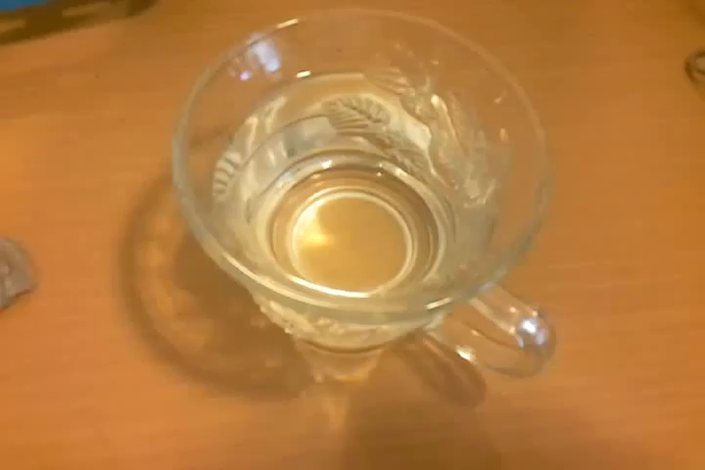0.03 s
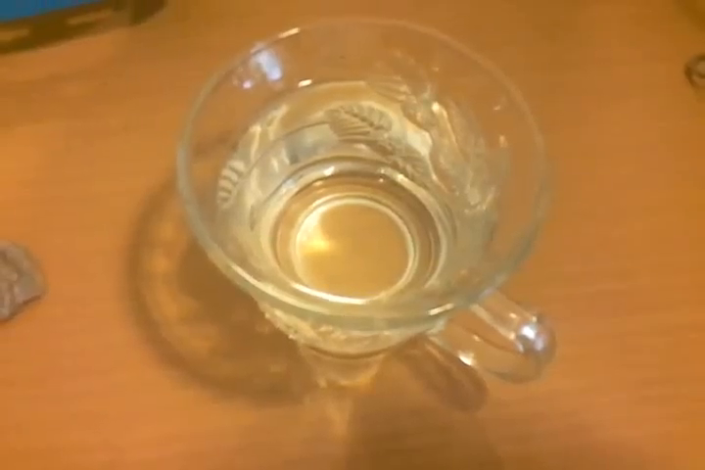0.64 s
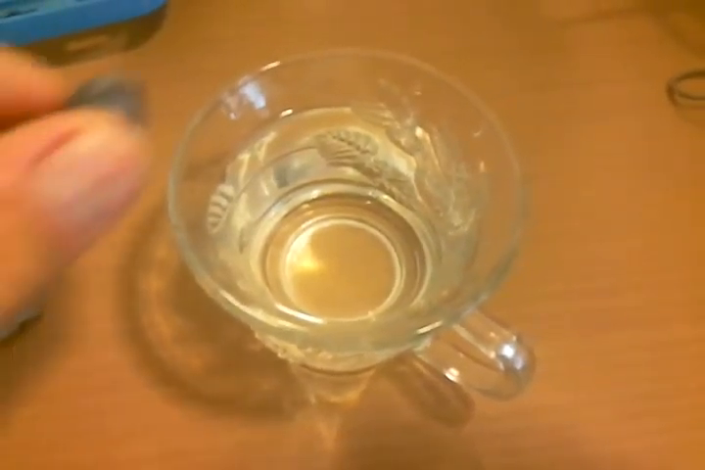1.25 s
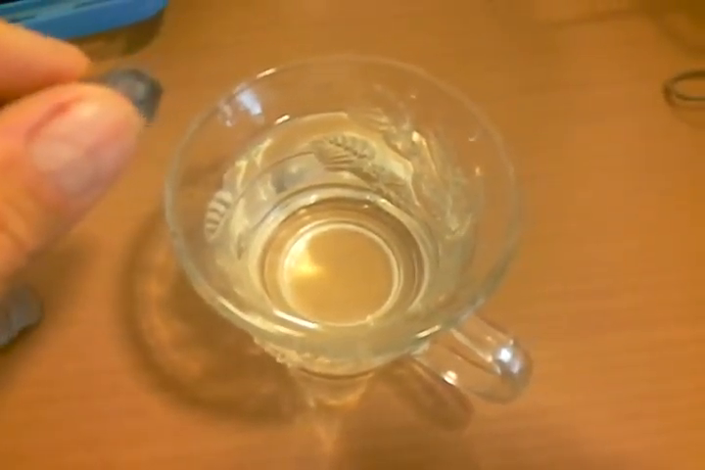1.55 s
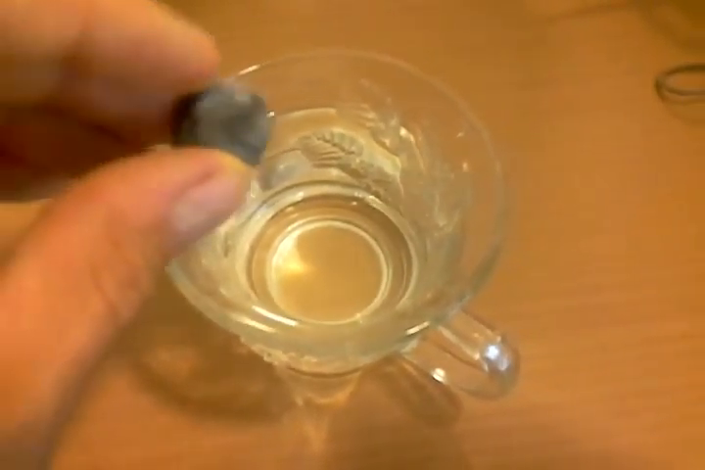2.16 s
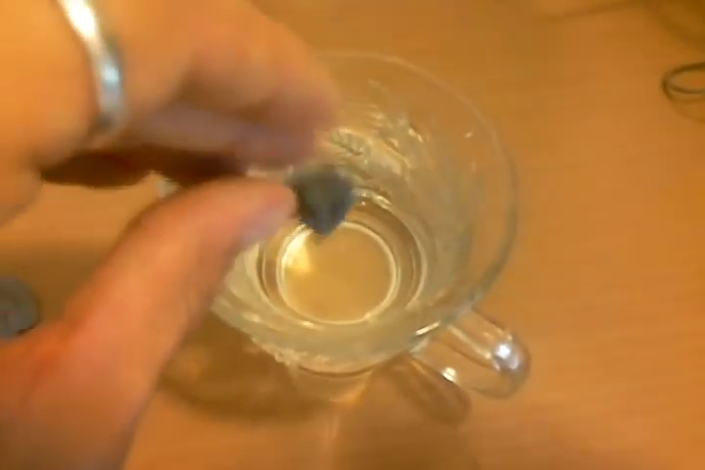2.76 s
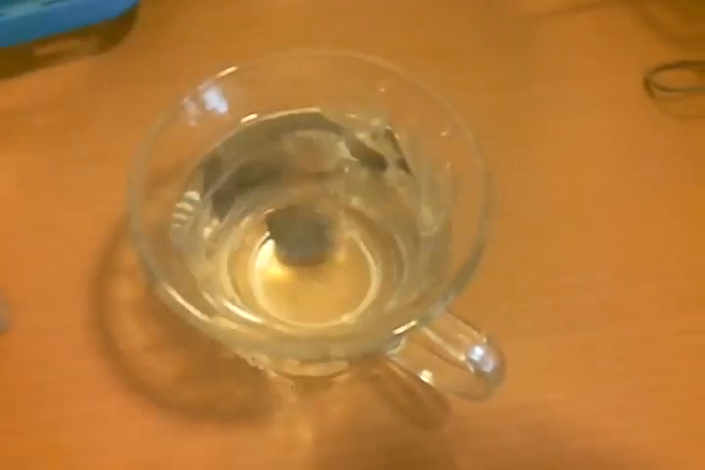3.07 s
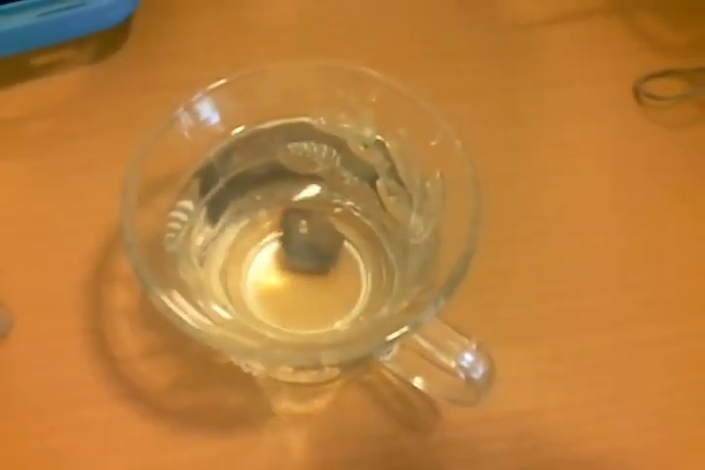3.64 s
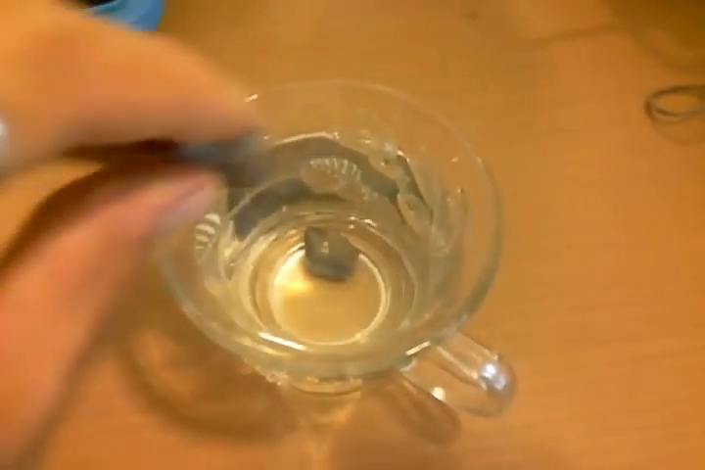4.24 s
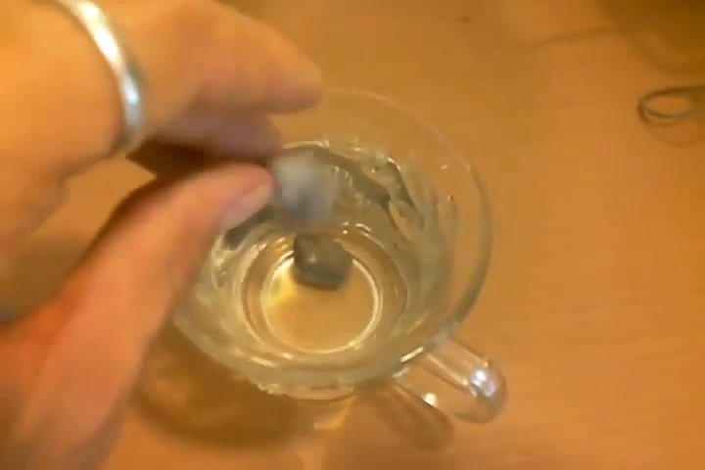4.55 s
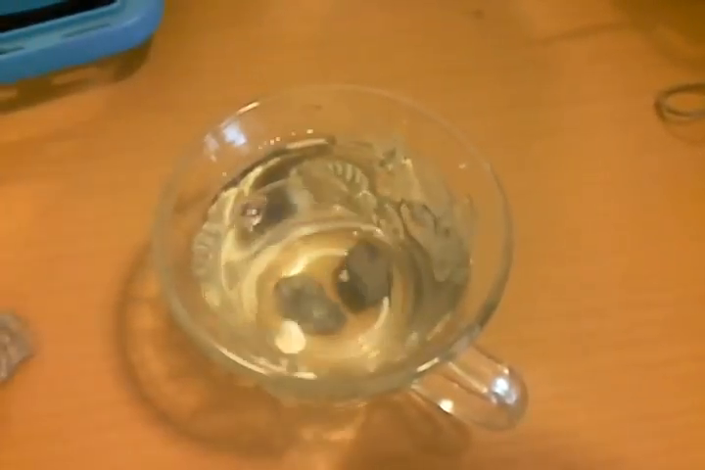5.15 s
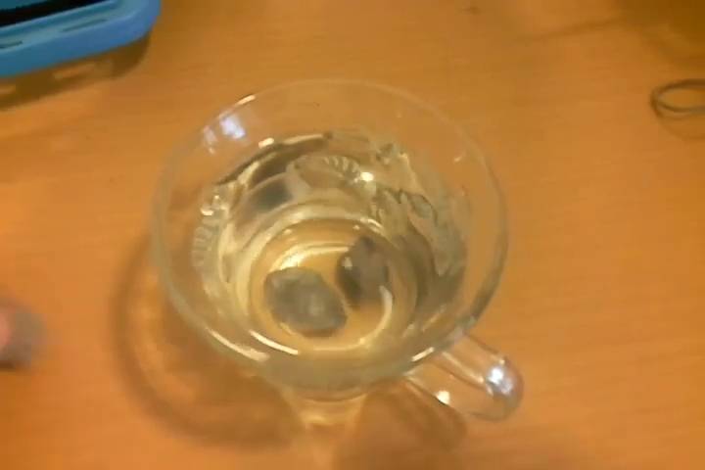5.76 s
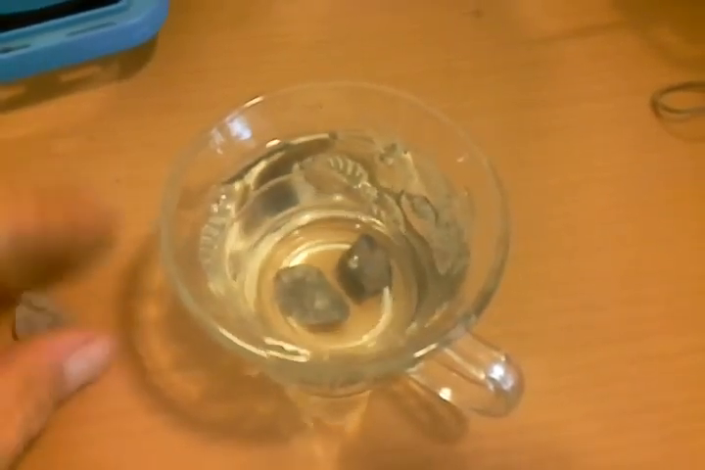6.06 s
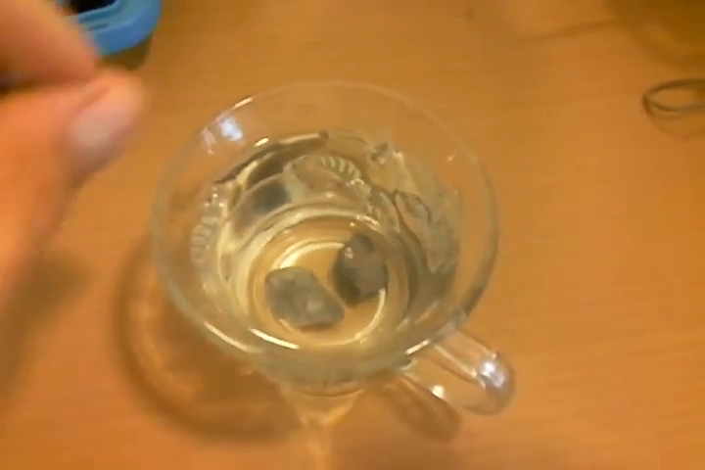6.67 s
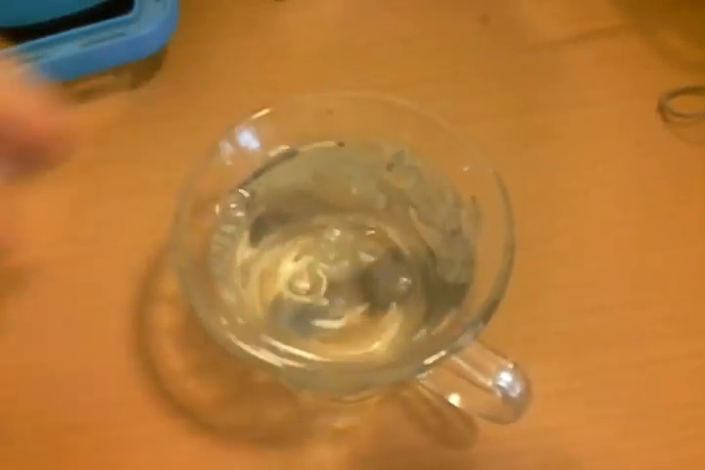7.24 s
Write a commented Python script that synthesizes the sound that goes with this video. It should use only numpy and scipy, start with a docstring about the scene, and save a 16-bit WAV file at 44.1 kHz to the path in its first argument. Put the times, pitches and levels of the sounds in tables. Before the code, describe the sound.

Heard close up in a small room, three stones fall one at a time into a glass of water, about two seconds apart. Each makes a short splash and plop, then a flurry of bright, glassy clinks as it bounces and settles. Between the second and third drops, loose stones knock, rattle and drag on a wooden tabletop. A low hum and soft hiss lie underneath.

```python
"""Three splashes, each with a flurry of glassy clinks: small stones drop one by one into a cup of water.
Each traps a few ringing bubbles and bounces: low in the cup it pings, higher up it excites the
resonant modes of the wall, which go slightly flat as the stone settles. Between drops, loose stones
knock and drag on the wooden table. A mains hum and soft hiss fill the small room."""
import sys
import numpy as np
from scipy import signal
from scipy.fft import rfft, irfft
from scipy.io import wavfile
from scipy.ndimage import uniform_filter1d, minimum_filter1d

SR = 44100
rng = np.random.default_rng(int(sys.argv[2]) if len(sys.argv) > 2 else 0)


def to_wav(s):
    """Save 16-bit WAV."""
    ch = np.atleast_2d(s).T  # columns
    pcm = np.round(np.clip(ch, -1, 1) * 32767)  # PCM
    wavfile.write(sys.argv[1], SR, pcm.astype(np.int16))


N = 331191

# the dropped stones: splash_s, splash_db, heft_db, brightness_db, flat_cents, settling_sag_cents
STONES = [(2.970, -29, 2.5, 11.5, -1.5, 5.1), (4.759, -19, 8.5, 3.5, 5, 17.6),
          (7.174, -18.5, 2, -1, 13, 10.3)]
# contacts of stone on glass: start_s, force_db, ping_hz, height (0 bottom, 1 wall),
# turn (0 clear of the handle, 1 in line with it)
CLINKS = [(2.9644, -12.5, 9200, 0.54, 0), (2.97, -4.5, 9320, 0.11, 0.29), (2.994, -22.5, 9300, 0.8, .0),
          (3.035, -21, 9740, 0.4, 0.24), (3.074, -28, 9250, 0.81, .05), (3.1075, -31, 9000, .05, 0.32),
          (3.128, -29, 9000, .05, 0.14), (3.1597, -21.5, 8900, 0.7, .05), (3.1715, -21.5, 9030, .05, 0.11),
          (3.1807, -25, 8970, .05, 0.057), (3.2075, -30, 9050, 0.39, 0), (3.2276, -21.5, 9060, 0.56, .05),
          (3.257, -38, 8700, .3, 0.36), (4.759, -2, 8920, .46, 0), (4.7789, -2, 8740, 0.61, 1),
          (4.7973, -12.5, 8800, 1, 0.16), (4.803, -11, 8900, 0.72, 0.7), (4.8268, -8, 9070, 0.6, 0.24),
          (4.882, -6, 8920, 0.88, .0), (4.941, -19, 8300, 0.29, 0.32), (4.9556, -11, 8830, 0.76, 0.16),
          (5.023, -19.5, 8870, 0.4, 0.25), (7.161, -20, 6240, 0.42, .1), (7.167, -18, 8850, 0.53, 0.12),
          (7.1706, -4, 8650, .05, 0.25), (7.2186, -5, 8800, 0.49, 0.045), (7.253, -9.5, 9000, 0.54, 0),
          (7.284, -17.5, 8810, .45, 0.62), (7.3059, -13, 9040, 0.93, 0.3)]
# spectra of the brief sounds: frequency_hz, level_db
WOOD_SPECTRUM = [(40, -58.5), (150, -28), (300, -23), (550, -7.5), (1050, -3), (1450, 2), (1850, -1.5),
                 (2600, -13.5), (4500, -27.5), (7000, -31), (8200, -44.5), (15000, -59.5)]  # the table top under a stone
CLICK_SPECTRUM = [(40, -62), (1000, -13.5), (2800, -9.5), (4300, -1), (5200, -5), (6000, -1), (6650, 0.5),
                  (7300, -12.5), (8000, -20), (11000, -33.5), (15000, -48)]  # a hard corner on the table
TICK_SPECTRUM = [(40, -47.5), (400, -17), (1000, -10), (1800, 2), (3000, -14.5), (4300, -3.5), (7000, 4),
                 (9500, -8), (11000, -9), (15000, -18.5)]  # stone touching glass
THUD_SPECTRUM = [(25, -41.5), (60, -16.5), (120, 3), (170, 6), (300, -1.5), (480, -2), (700, -12),
                 (2000, -44.5)]  # a blow passed into the table
SPLASH_SPECTRUM = [(40, -47), (1000, -21), (6000, -17.5), (10500, 9.5), (12500, -0.5), (15000, -3.5)]  # the water surface breaking


def amp(db):
    return 10 ** (np.asarray(db) / 20)


def unit_rms(x):
    return x / np.sqrt(np.mean(x ** 2) + 1e-20)


def ramp(t, length):
    return np.clip(t / length, 0, 1)


def decay(t, t60):
    """Exponential damping: the amplitude falls 60 dB in t60 seconds."""
    return np.exp(-np.log(1000) * t / t60)


def curve_at(points, hz):
    """Interpolation of (frequency_hz, value) points on a logarithmic frequency axis."""
    f, value = np.transpose(points)
    return np.interp(np.log(hz + 1), np.log(f + 1), value)


def add(mix, start_s, sound):
    part = mix[round(start_s * SR):][:len(sound)]
    part += sound[:len(part)]


def noise(spectrum, size):
    """Spectral shaping of white noise, scaled to unit rms."""
    gain = amp(curve_at(spectrum, np.fft.rfftfreq(size, 1 / SR)))
    return unit_rms(irfft(rfft(rng.standard_normal(size)) * gain, size))


def pulse(spectrum, size=4096):
    """A minimum-phase impulse: one causal blow of unit energy with the given spectrum."""
    log_gain = np.log(amp(curve_at(spectrum, abs(np.fft.fftfreq(size, 1 / SR)))))
    blow = np.fft.ifft(np.exp(np.conj(signal.hilbert(log_gain)))).real
    return blow / np.linalg.norm(blow)


def burst(spectrum, t60, size=8192):
    """A noise transient: abrupt onset, exponential decay, filtered to the given spectrum."""
    puff = rng.choice([-1, 1], size) * decay(np.arange(size) / SR, t60)
    return signal.fftconvolve(puff, pulse(spectrum))


def background(hiss_db=-45.5, waver_db=.5, fade_at_s=.37, fade_s=.36, sag_s=.4, hold_s=.84, recover_s=.56):
    """Wavering mains hum superposed on broadband hiss; both fade in, and their level dips twice."""
    # partials of the hum: pitch_hz, rms_db
    hum_partials = [(100, -60.5), (200, -48.5), (350, -65)]
    # spectrum of the hiss: frequency_hz, level_db
    hiss_spectrum = [(15, -56), (25, -26), (93, -13), (167, -9.5), (196, -7), (231, -16), (335, -5),
                     (475, -15), (749, -12.5), (903, -15), (1580, -14), (2780, -28), (6200, -26.5),
                     (8550, -34), (15000, -35)]
    # dips in level: start_s, sudden_drop_db, further_sag_db
    dips = [(2.959, 5, 8.5), (5.93, 0, 4.5)]
    hum, t = np.zeros(N), np.arange(N) / SR
    for hz, db in hum_partials:
        waver = noise([(1, 0), (5, -6), (15, -40), (60, -120)], N)
        hum += np.sqrt(2) * amp(db + waver_db * waver) * np.sin(2 * np.pi * (hz * t + rng.random()))
    level = amp(-67) + ramp(t - fade_at_s, fade_s) ** 1.63
    for s, drop_db, sag_db in dips:
        held = (t > s) * (1 - ramp(t - s - hold_s, recover_s))
        level *= amp(-held * (drop_db + sag_db * ramp(t - s, sag_s)))
    return (hum + amp(hiss_db) * noise(hiss_spectrum, N)) * level


def table_knocks(blow_db=22, snap_db=17, grit_db=4, wood_t60=.035, grit_t60=.017):
    """Impact on a damped plate: a rocking stone gives a blow and snap, then a short, gritty rattle."""
    # stones striking the table: start_s, wood_db, click_db
    knocks = [(2.927, -42, -48.5), (3.5082, -50, -54), (3.568, -50.5, -63), (5.438, -29, -44),
              (5.4497, -31.5, -37), (5.6636, -35.5, -50), (5.693, -28, -45), (5.698, -34, -50),
              (5.915, -11.5, -20.5), (5.9473, -19.5, -14.5), (5.9594, -17.5, -13.5), (5.9656, -27, -16.5),
              (5.987, -19, -24.5), (6.001, -20.5, -16), (6.015, -25.5, -28), (6.2367, -30.5, -43),
              (6.242, -39, -35)]
    out = np.zeros(N)
    for s, wood_db, click_db in knocks:
        add(out, s, amp(wood_db + blow_db) * pulse(WOOD_SPECTRUM))
        add(out, s, amp(click_db + snap_db) * pulse(CLICK_SPECTRUM))
        add(out, s, amp(wood_db) * burst(WOOD_SPECTRUM, wood_t60))
        add(out, s, amp(click_db + grit_db) * burst(CLICK_SPECTRUM, grit_t60))
    return out


def heft_and_brightness(s):
    """Heft and brightness, in dB, of the stone whose splash is nearest to time s."""
    return min(STONES, key=lambda stone: abs(stone[0] - s))[2:4]


def mode_drive_db(s, force_db, height, turn):
    """Modal coupling depends on the point struck; heavy stones favour the rim modes, sharp ones the top."""
    # coupling to each mode family: bottom_db, height_gain_db, turn_gain_db
    coupling = [(-58, 12, -2.5), (-57.5, 5.5, 16.5), (-40, 29, -22), (-61, 32, 24.5), (-22.5, -7.5, 2.5),
                (-32.5, 1, -13.5)]
    heft_db, bright_db = heft_and_brightness(s)
    rim, rim_twin, wall, wall_twin, bowl, top = [
        bottom + up * height + around * turn for bottom, up, around in coupling]
    rim_push_db = .55 * force_db + .91 * heft_db
    return (rim + rim_push_db, rim_twin + rim_push_db, wall + force_db, wall_twin + force_db,
            bowl + force_db, top + force_db + bright_db)


def detuned_time(sway_cents=3, settle_after_s=.12, settle_s=.0047):
    """Frequency modulation as warped time: settling stones flatten the modes, rocking water sways them."""
    t, cents = np.arange(N) / SR, np.zeros(N)
    for s, *_, flat, sag in STONES:
        settled = ramp(t - s - settle_after_s, settle_s)
        cents = np.where(t > s - .5, -flat - sag * settled, cents)
    sway = noise([(1, -30), (6, 0), (18, -3), (50, -40), (150, -120)], N)
    return np.cumsum(2 ** ((cents + sway_cents * sway) / 1200)) / SR


def cup_ring(ring_db=4, touch_db=-1.4, rise_s=.0014, fine_above_hz=10000, scatter_db=9.5):
    """Modal resonance of the glass: each contact excites the modes and slightly damps what still rings."""
    # modes by family, the handle splitting rim and wall modes into twins: pitch_hz, level_db, t60_s
    mode_families = [
        [(1927, 2, 0.55)],
        [(2046, -5.5, .45)],
        [(5085, 3.5, 0.17)],
        [(4870, -1.5, 0.13), (6150, -7, 0.29)],
        [(9010, 1.5, .16), (8400, -3, 0.068), (8690, -8.5, .1), (8330, -13.5, 0.1)],
        [(10440, 2.5, 0.091), (11040, -11, 0.1), (11500, -15, 0.13), (12600, -14.5, .12), (12700, -18.5, 0.092),
         (13400, -19.5, .12), (14720, -18, .14)],
    ]
    t, clock, out = np.arange(SR) / SR, detuned_time(), np.zeros(N)
    starts = [row[0] for row in CLINKS]
    drives = [mode_drive_db(s, force_db, height, turn) for s, force_db, _, height, turn in CLINKS]
    touch_count = uniform_filter1d(np.searchsorted(starts, np.arange(N) / SR).astype(float), size=64)
    later_touches = [np.maximum(touch_count[round(s * SR):][:SR] - k - 1, 0) for k, s in enumerate(starts)]
    dampings = [amp(touch_db * count) for count in later_touches]
    for modes, family_db in zip(mode_families, np.transpose(drives)):
        for hz, db, t60 in modes:
            response = decay(t, t60) * (1 - np.exp(-t / rise_s))
            # the highest modes have close nodes, so a contact catches them by chance
            chance_db = (hz > fine_above_hz) * scatter_db * rng.uniform(-1, 1, len(starts))
            envelope = np.zeros(N)
            for s, drive_db, damping in zip(starts, family_db + chance_db, dampings):
                add(envelope, s, amp(drive_db + db + ring_db) * damping * response[:len(damping)])
            out += envelope * np.sin(2 * np.pi * hz * clock)
    return out


def ping(pitch_hz, contact_s=.0004):
    """Damped free vibration: three close partials build up during the contact and die quickly."""
    # partials of the ping: pitch_ratio, level_db, t60_s
    partials = [(.95, -6, 0.041), (1.0, 3, .022), (1.06, -20, .018)]
    t = np.arange(4096) / SR
    tone = sum(amp(db) * decay(t, t60) * np.sin(2 * np.pi * ratio * pitch_hz * t)
               for ratio, db, t60 in partials)
    return tone * (1 - np.exp(-t / contact_s))


def cup_impacts(blow_rise_db=10, ping_fall_db=19):
    """Impact transients of stone on glass: from bottom to wall the blow grows and the ping fades."""
    out = np.zeros(N)
    for s, force_db, ping_hz, height, turn in CLINKS:
        heft_db, _ = heft_and_brightness(s)
        blow_db = force_db + heft_db + blow_rise_db * height
        ping_db = force_db - ping_fall_db * height
        top_db = mode_drive_db(s, force_db, height, turn)[-1]
        tick = amp(blow_db - 29) * burst(TICK_SPECTRUM, t60=.02)
        thud = amp(blow_db - 43) * burst(THUD_SPECTRUM, t60=.056)
        crack = amp(blow_db - 8) * pulse(TICK_SPECTRUM)
        tone = amp(ping_db + 5.5) * ping(ping_hz)
        fizz = amp(ping_db - 24) * burst(TICK_SPECTRUM, t60=.063)
        shimmer = amp(top_db - 8) * burst(SPLASH_SPECTRUM, t60=.13)  # crowded top modes blur into noise
        for sound in tick, thud, crack, tone, fizz, shimmer:
            add(out, s, sound)
    return out


def bubbles(t60_cycles=71, climb_per_s=.5, rise_s=.00035):
    """Minnaert resonance: air pinches off with a pop and gulp, then rings, rising as it nears the surface."""
    # air trapped by the sinking stones: start_s, pitch_hz, level_db
    trapped_air = [(2.967, 1553, -37.5), (3.0341, 1460, -26), (3.0354, 1660, -26), (3.036, 2490, -30),
                   (3.075, 1570, -35), (3.075, 2474, -32), (3.108, 2520, -38), (3.129, 2470, -38),
                   (4.758, 990, -23.5), (4.797, 1090, -26), (4.83, 1150, -30), (7.171, 1404, -29),
                   (7.217, 1367, -24)]
    out, t = np.zeros(N), np.arange(8192) / SR
    for s, hz, db in trapped_air:
        envelope = decay(t, t60_cycles / hz) * (1 - np.exp(-t / rise_s))
        add(out, s, amp(db) * envelope * np.sin(2 * np.pi * hz * (t + climb_per_s * t ** 2 / 2)))
        heft_db, _ = heft_and_brightness(s)
        pop = amp(-3) * burst(TICK_SPECTRUM, t60=.011)
        gulp = amp(-17) * burst(THUD_SPECTRUM, t60=.041)
        add(out, s, amp(db + heft_db) * (pop + gulp))
    return out


def splashes():
    """Water entry: each stone breaks the surface with a brief crackle of bright noise."""
    out = np.zeros(N)
    for s, db, *_ in STONES:
        add(out, s, amp(db) * burst(SPLASH_SPECTRUM, t60=.053))
    return out


def scrapes(slips_per_s=3000, swell_s=.023):
    """Stick-slip friction: a dragged stone catches on the wood grain in a dense run of tiny slips."""
    # drags over the table: peak_s, fade_s (to fall 40 dB), wood_db, grit_db
    drags = [(3.568, 0.039, -45.5, -59), (5.41, 0.1, -66, -52.5), (5.698, 0.04, -31.5, -52),
             (5.987, 0.22, -34.5, -38), (6.252, 0.04, -35.5, -49.5), (6.37, 0.066, -50, -68)]
    out, t = np.zeros(N), np.arange(N) / SR
    for peak_s, fade_s, wood_db, grit_db in drags:
        span = t[(t > peak_s - 2 * swell_s) & (t < peak_s + fade_s)]
        age = span - peak_s
        pressure = np.where(age < 0, np.exp(-(age / swell_s) ** 2), amp(-40 * age / fade_s))
        for spectrum, db in (WOOD_SPECTRUM, wood_db), (CLICK_SPECTRUM, grit_db):
            slips = unit_rms(rng.standard_normal(SR) * (rng.random(SR) < slips_per_s / SR))
            add(out, span[0], amp(db) * signal.fftconvolve(slips[:len(span)] * pressure, pulse(spectrum)))
    return out


def room(sound, onset_s=.003):
    """Reverberation: dense reflections from the table and near walls, each band decaying at its own rate."""
    # reverberation times: frequency_hz, t60_s
    reverb_times = [(300, 0.49), (1000, 0.25), (3000, 0.23), (7000, 0.32), (9000, 0.05), (14000, 0.064)]
    hz, t, bands = signal.stft(rng.standard_normal(SR // 2), SR, nperseg=256)
    _, tail = signal.istft(bands * decay(t, curve_at(reverb_times, hz)[:, None]), SR, nperseg=256)
    tail *= 1 - np.exp(-(np.arange(len(tail)) / SR / onset_s) ** 2)
    return signal.fftconvolve(sound, tail / np.linalg.norm(tail))[:N]


def scene(cup_reverb_db=-11, table_reverb_db=-13):
    """Superposition of the direct sound of cup and table, their reverberation and the background."""
    cup = cup_ring() + cup_impacts() + bubbles() + splashes()
    table = table_knocks() + scrapes()
    reflections = room(amp(cup_reverb_db) * cup + amp(table_reverb_db) * table)
    return (cup + table + reflections + background())[None]


def record(dry, cutoff_hz=15200):
    """Peak limiting holds the loudest blows near full scale; a low-pass filter then limits the band."""
    needed_gain = 1 / np.maximum(abs(dry), 1)
    smooth_gain = uniform_filter1d(minimum_filter1d(needed_gain, size=32), size=32)
    lowpass = signal.firwin(255, cutoff_hz, window=("kaiser", 9), fs=SR)
    return signal.oaconvolve(dry * smooth_gain, lowpass[None], "same")


dry = scene()
out = record(dry)
to_wav(out)
```